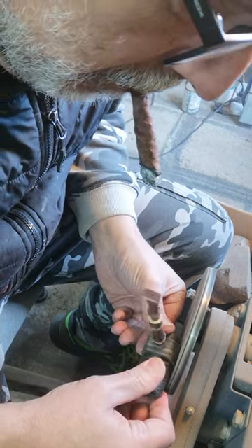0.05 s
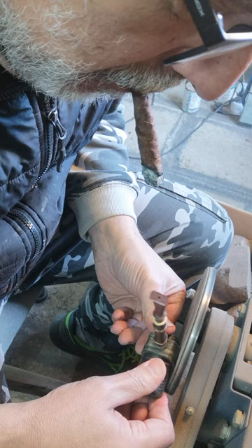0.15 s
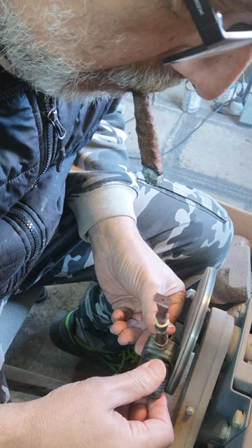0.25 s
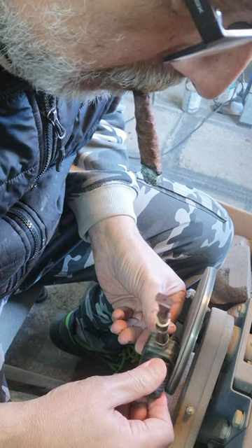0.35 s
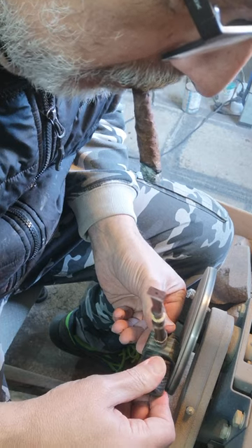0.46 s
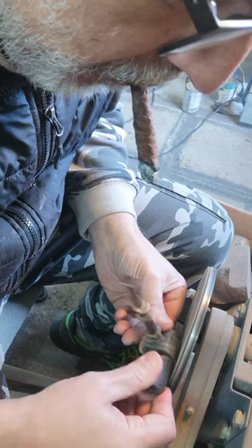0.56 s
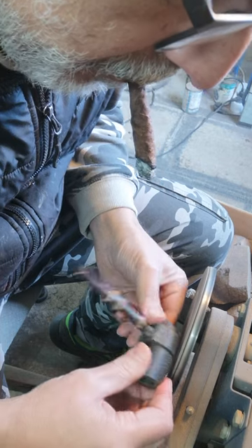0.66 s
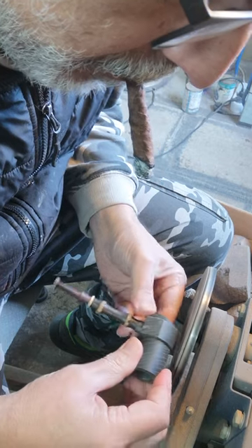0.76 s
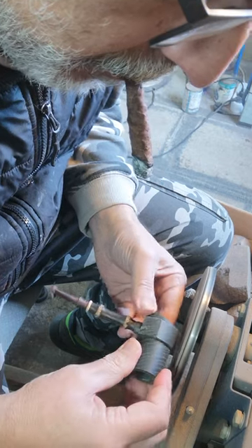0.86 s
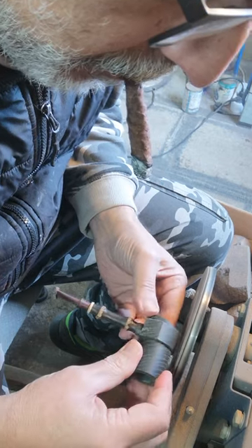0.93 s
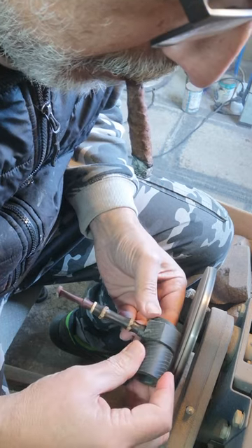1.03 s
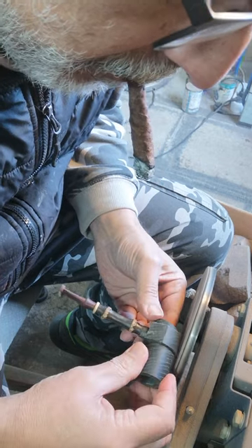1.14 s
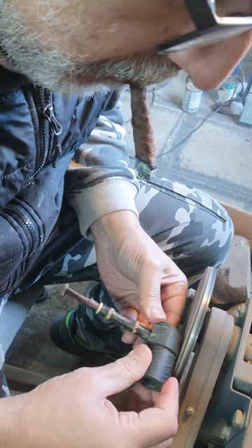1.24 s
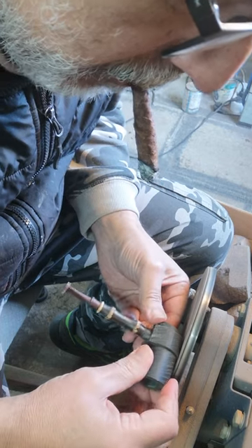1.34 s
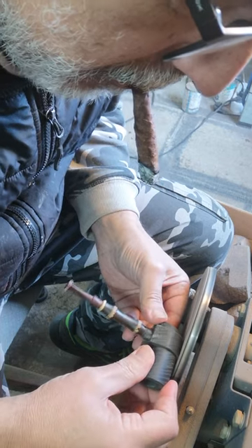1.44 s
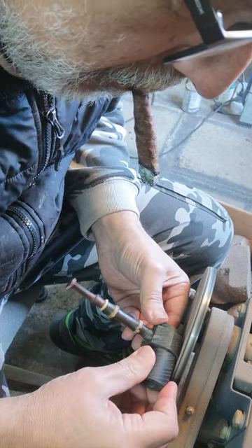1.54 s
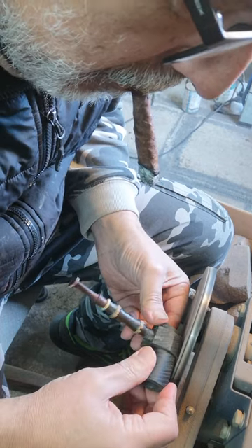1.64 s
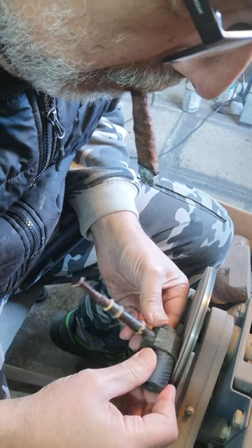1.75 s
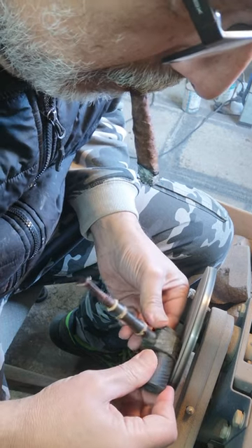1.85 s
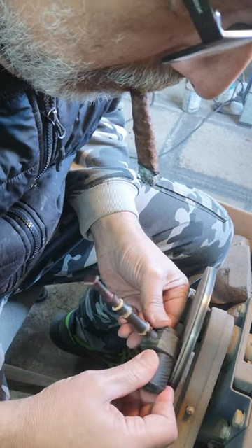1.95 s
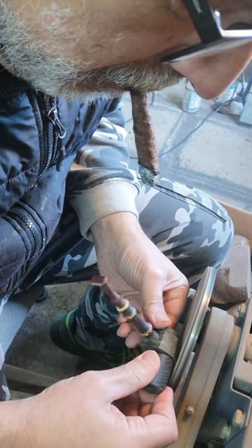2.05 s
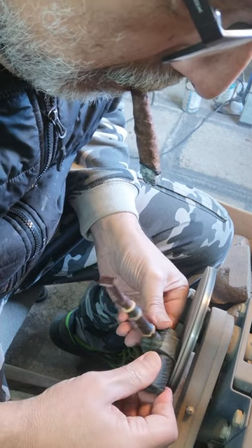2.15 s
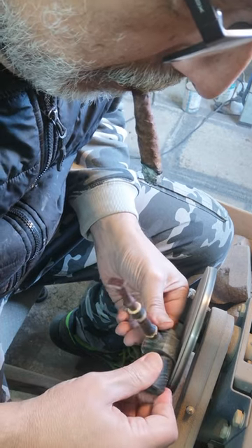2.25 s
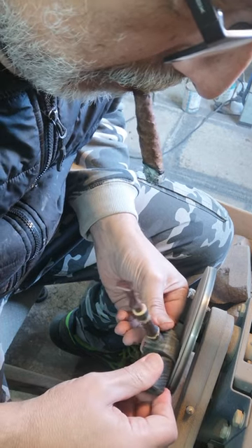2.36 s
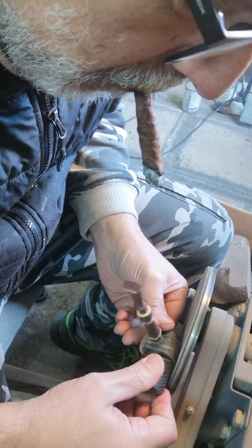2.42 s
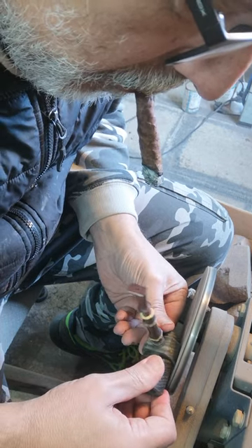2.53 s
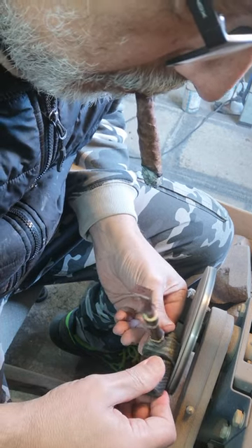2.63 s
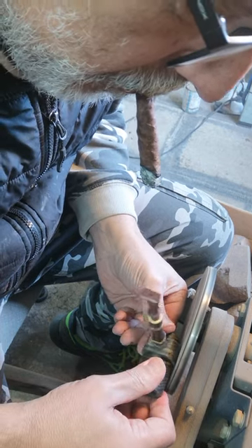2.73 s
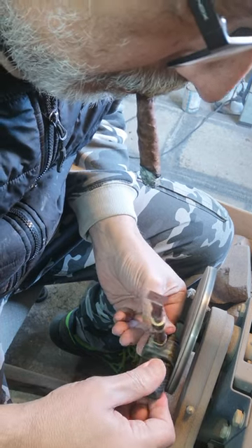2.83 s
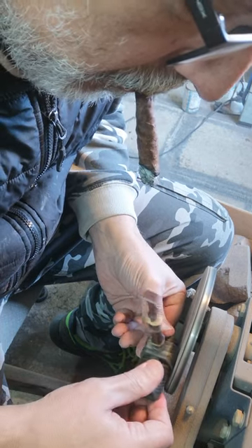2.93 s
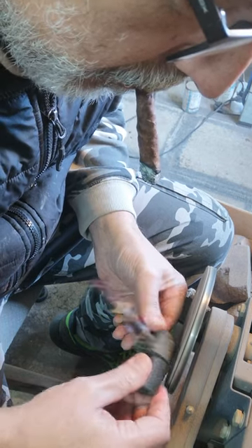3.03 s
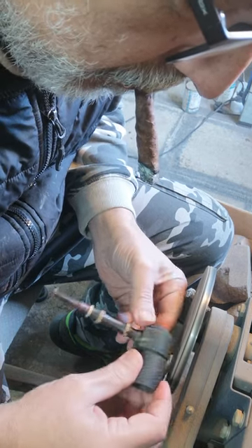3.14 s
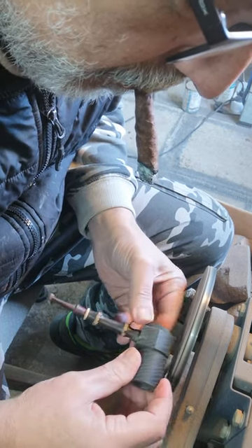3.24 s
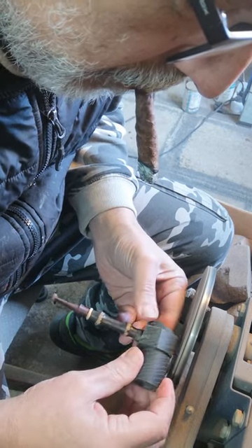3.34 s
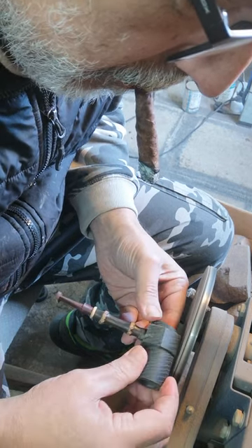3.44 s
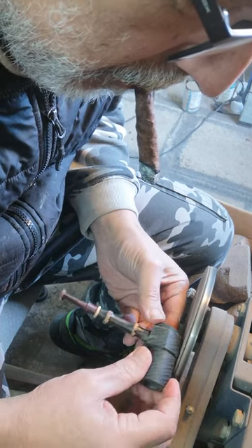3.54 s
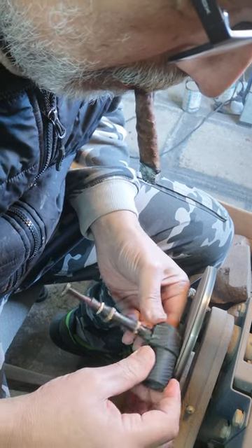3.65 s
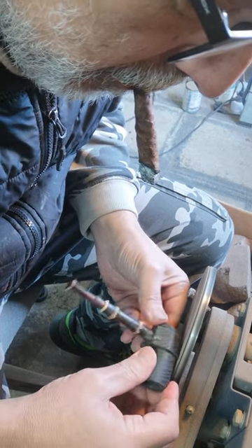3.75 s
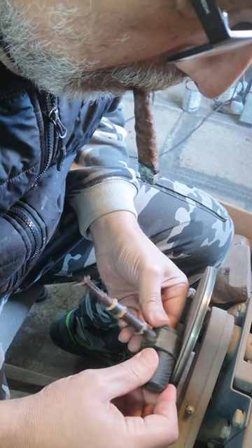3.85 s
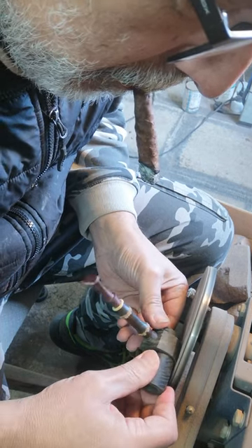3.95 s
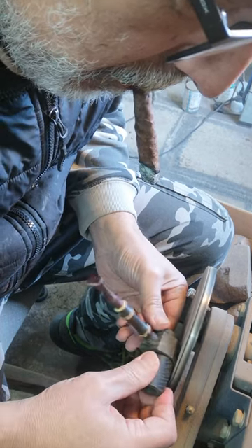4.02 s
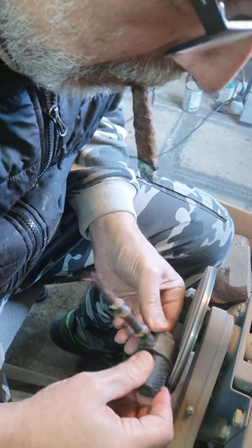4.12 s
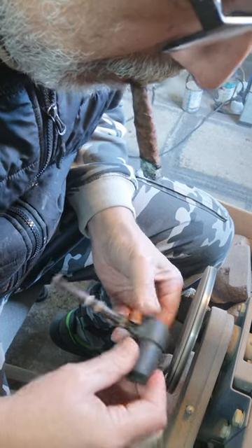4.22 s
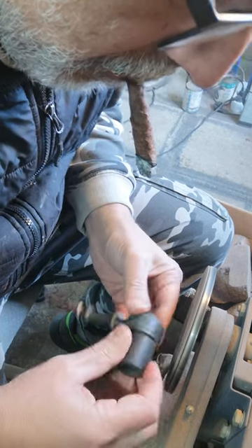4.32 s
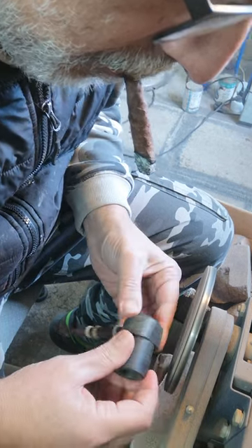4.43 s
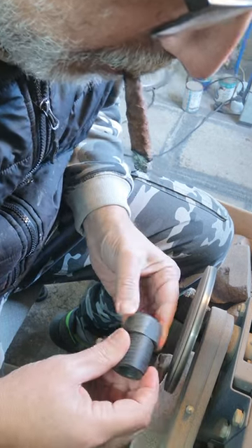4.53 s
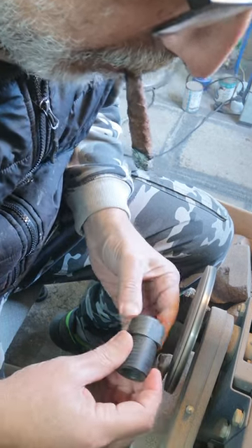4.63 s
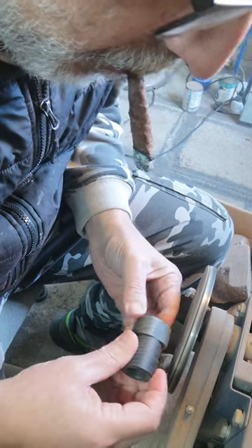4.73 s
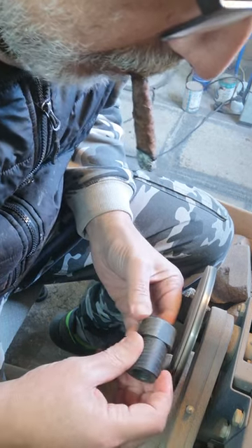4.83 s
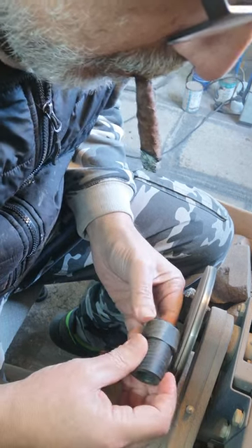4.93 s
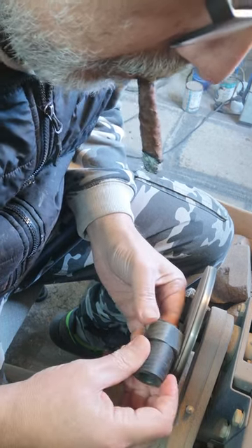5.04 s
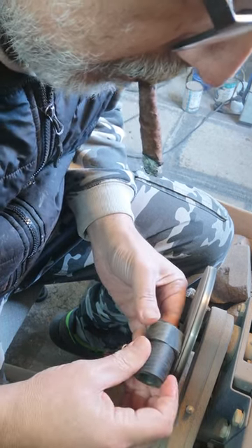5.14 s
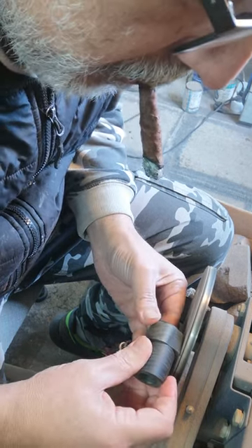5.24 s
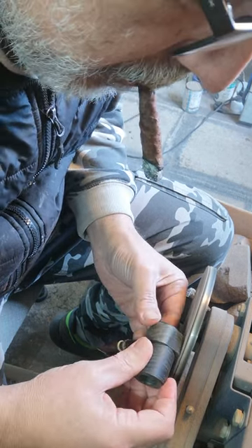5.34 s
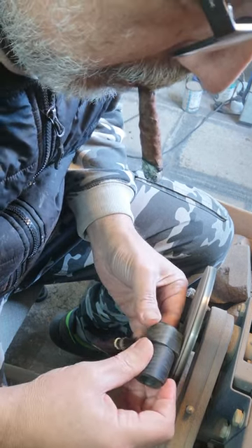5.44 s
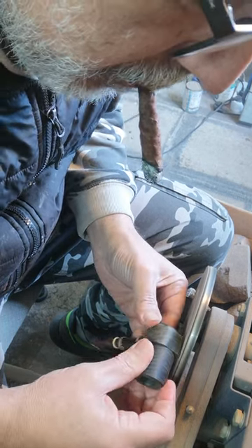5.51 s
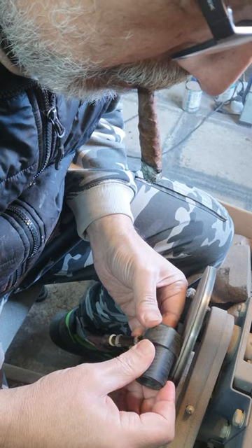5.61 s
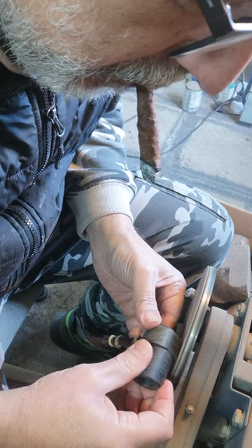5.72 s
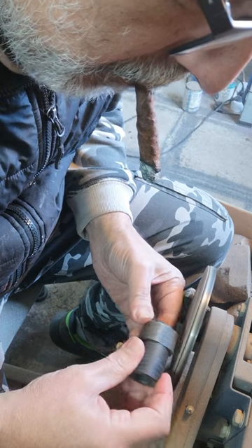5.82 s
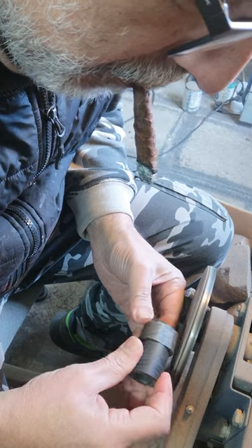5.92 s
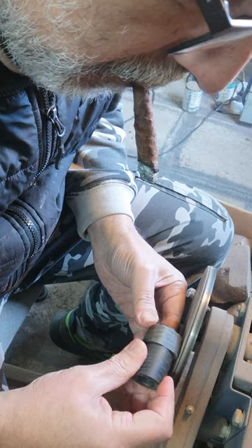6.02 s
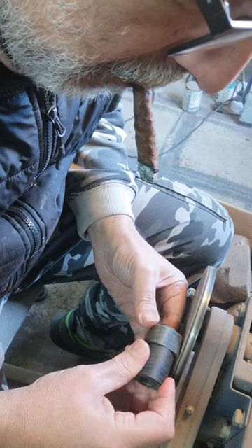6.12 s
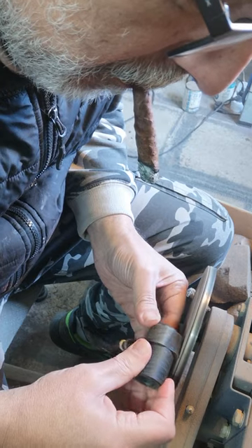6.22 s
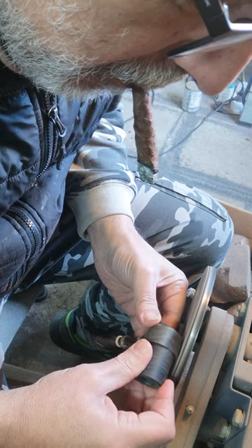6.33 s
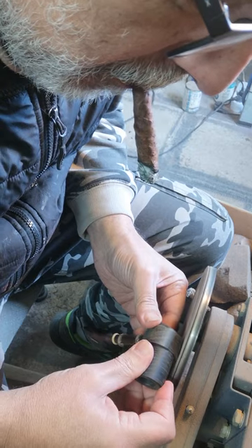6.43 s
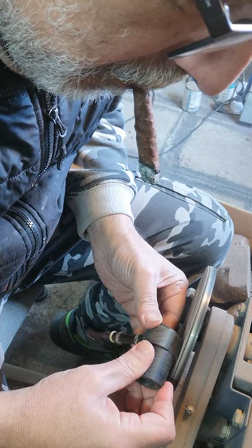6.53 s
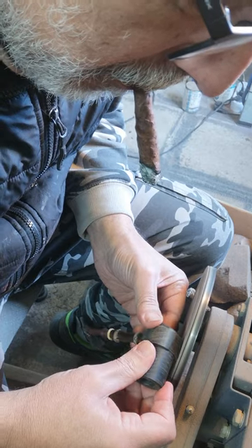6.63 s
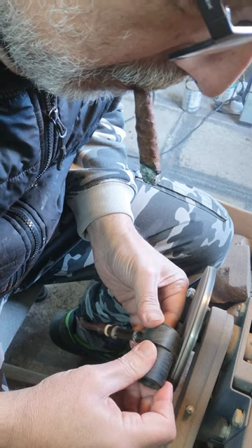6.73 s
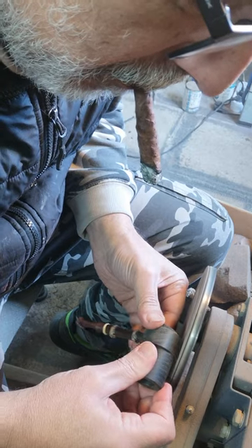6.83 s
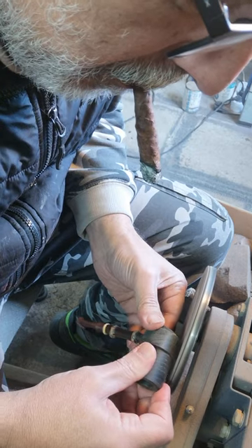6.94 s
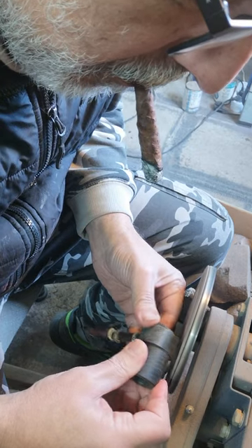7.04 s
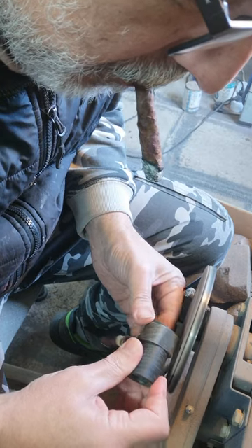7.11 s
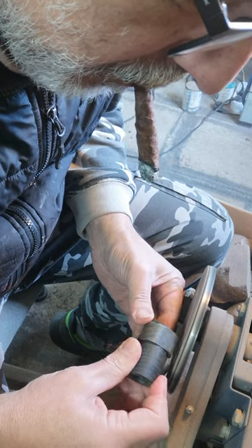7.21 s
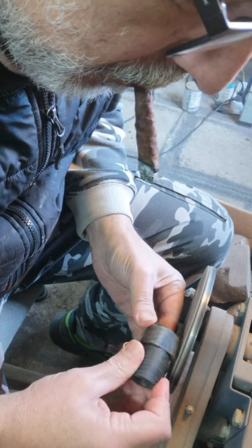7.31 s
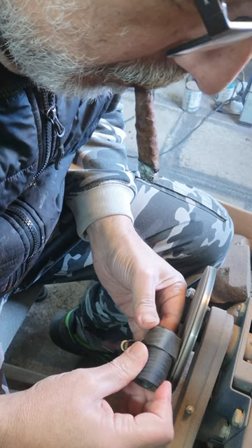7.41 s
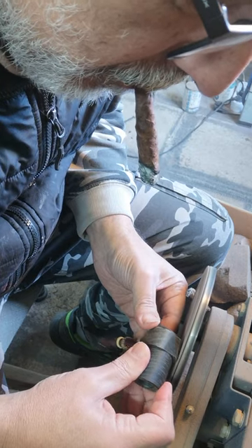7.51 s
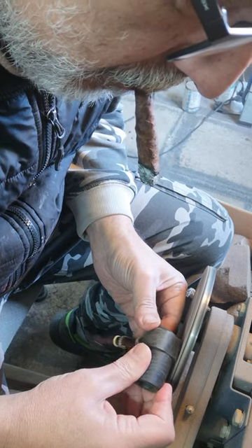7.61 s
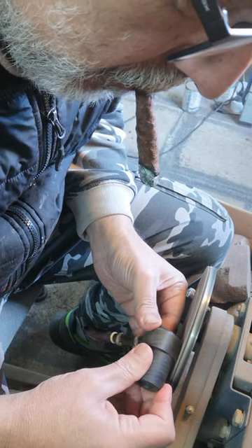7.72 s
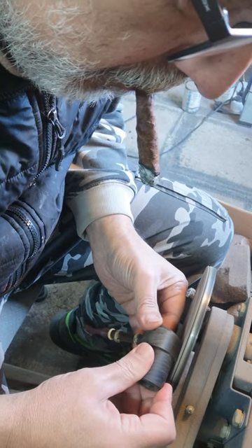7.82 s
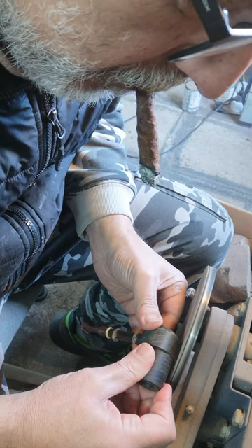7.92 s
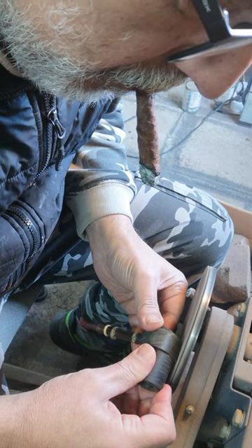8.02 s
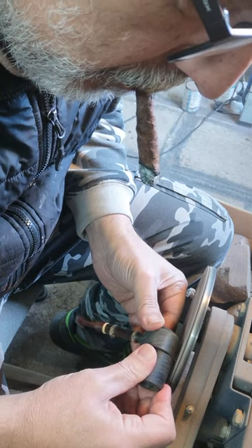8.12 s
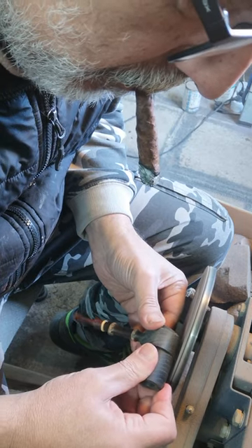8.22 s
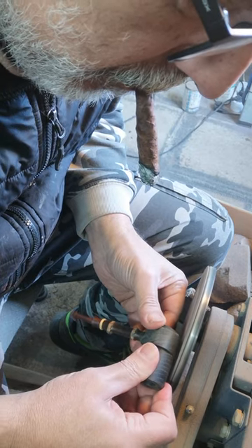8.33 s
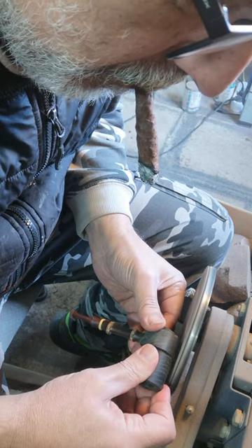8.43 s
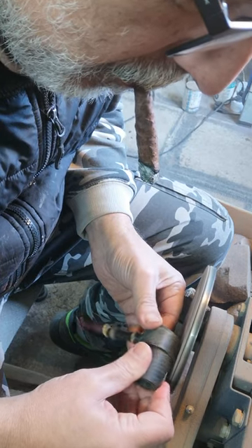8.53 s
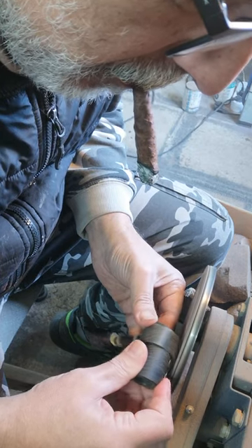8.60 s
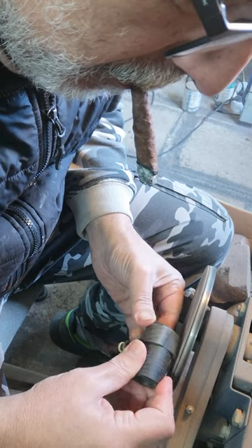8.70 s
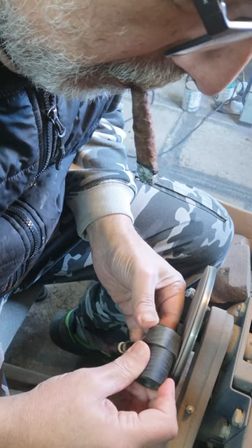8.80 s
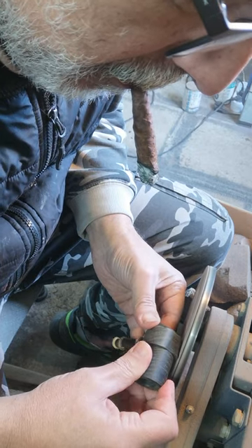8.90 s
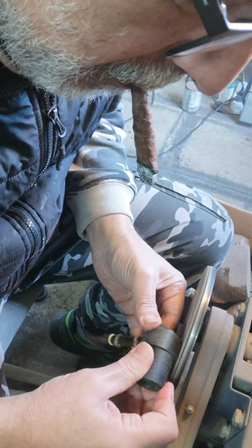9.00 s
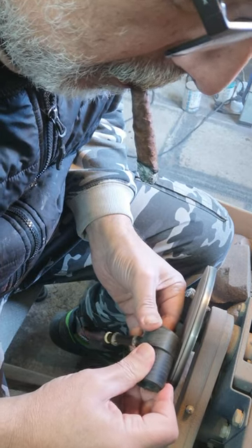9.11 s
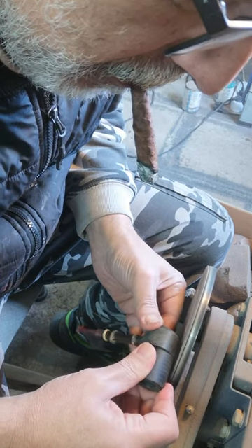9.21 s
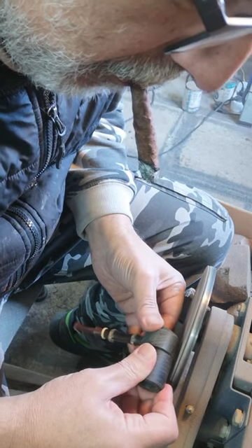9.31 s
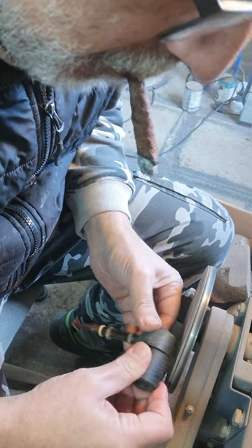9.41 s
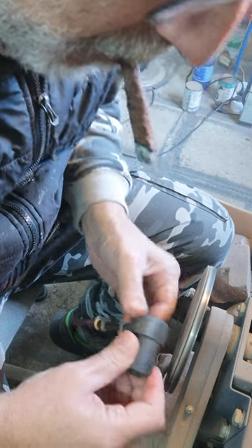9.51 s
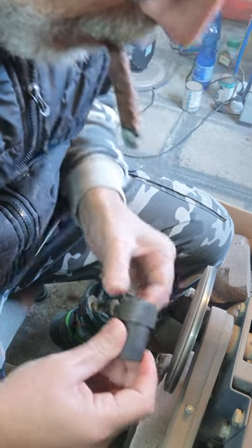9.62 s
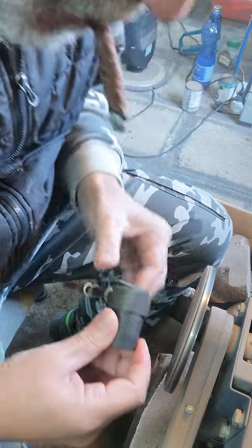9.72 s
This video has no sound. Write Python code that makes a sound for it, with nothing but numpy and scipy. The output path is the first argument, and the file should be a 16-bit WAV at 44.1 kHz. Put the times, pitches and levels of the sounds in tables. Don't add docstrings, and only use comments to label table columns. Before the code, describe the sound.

Seven coarse, fizzy sanding rasps of uneven length, with a low electric motor throb swelling in the gaps and a few dull knocks.

```python
import sys
import numpy as np
from scipy import signal
from scipy.fft import rfft, irfft
from scipy.io import wavfile
from scipy.ndimage import uniform_filter1d

SR = 44100
rng = np.random.default_rng(int(sys.argv[2]) if len(sys.argv) > 2 else 0)


def generate_wav(sig):
    pcm = np.round(np.clip(np.atleast_2d(sig).T, -1, 1) * 32767).astype(np.int16)
    wavfile.write(sys.argv[1], SR, pcm)


def field_ratio(decibels):
    return 10 ** (np.asarray(decibels, dtype=float) / 20)


N = 430416
T = np.arange(N) / SR

# touch in seconds, hold in seconds, rasp level at landing
# in dB, level it settles towards in dB, settling time in seconds.
PRESSES = [
    (-0.3, 1, -21, -18.5, .35),
    (1.322, 1.738, -22.5, -18.5, 1.1),
    (3.651, 0.54, -26, -19, 0.31),
    (5.191, 0.63, -28.5, -17, 0.24),
    (6.166, .924, -28, -17.2, 0.1276),
    (7.486, 1.099, -25, -16.5, 0.244),
    (8.911, 0.56, -22.5, -15.5, 0.47),
]
# extra jolt at landing in dB, then, in dB from the rasp,
# low scrape, fizz at landing, fizz at lift and 4th shaft order (this last one an absolute level in dB).
FACES = [(0.1, -7.5, -7.5, -8, -39.5), (0.1, -7, -11.5, -6, -42), (6.5, -7.5, -8.5, -9.5, -43),
         (0.1, -10.5, -2.5, -5, -43), (0.1, -12, -3, -8, -42.5), (0.1, -12, -3, -10, -51),
         (0.1, -11, -3, -6.5, -48)]


def rasp(turns):
    # frequency in Hz, left level in dB, right level in dB.
    rasp_tone = [(1300, -100, -84), (2430, -60.5, -70.5), (3310, -56.5, -58.5), (4700, -51, -53),
                 (6010, -47, -57.5), (7140, -59, -55), (7050, -46.5, -55.5), (7900, -62, -54.5),
                 (9300, -91, -57), (10350, -64, -57.5), (11470, -64.5, -65.5), (12800, -68.5, -62),
                 (14200, -62, -65.5), (15900, -86, -60)]
    # frequency in Hz, likeness from 0 to 1, lead of the left in radians.
    rasp_pair = [(2400, .55, -2.9), (3300, .45, -2), (5200, .6, -2.2), (6000, .45, 1), (7200, .55, 3.1),
                 (7450, .6, 3.1), (7700, .85, 1), (8100, .7, .8), (8400, .7, -1.3), (9300, .65, 0),
                 (11000, .55, 1.2), (11600, .4, -.3), (13000, .55, -1), (15200, .5, -3.3)]
    # frequency in Hz, width in Hz, left level in dB, right level in dB.
    disc_rings = [(4183, 300, -81.5, -54), (6140, 86, -69.5, -133), (6920, 430, -82, -57),
                  (7473, 220, -42.5, -85), (7764, 344, -42, -77), (9150, 210, -50.5, -67),
                  (8600, 89, -49, -63), (9760, 320, -66.5, -51.5), (11400, 150, -82, -74.5),
                  (14000, 300, -70, -73)]
    landings_s = [.01, 0.032, .004, .012, 0.017, .005, .003]
    dull_per_db = 0.5
    low_linger, fine_hurry = 0.53, 0.2
    jolt_s = 0.033
    ease_db_per_s, part_db_per_s2 = 90, 2300

    hit = rng.random((2, N)) < 14000 / SR
    size_db = 2.0 * np.minimum(rng.exponential(1, (2, N)), 5)
    grit = hit * rng.choice([-1., 1.], (2, N)) * field_ratio(size_db)
    scrape = at_ports(evened(grit), rasp_tone, rasp_pair, disc_rings, ripple_db=2.0, ripple_hz=40)
    scrape = drifting(scrape, patchy_db=1.5)
    low = band(scrape, 1000, 6500)
    mid = band(scrape, 6500, 10000)
    fine = band(scrape, 10000, 30000)

    out = np.zeros((2, N))
    for press, face, land_s in zip(PRESSES, FACES, landings_s):
        jolt_db, low_db, first_db, last_db, _ = face
        since, after, gone, db = contact(*press)
        fall_db = ease_db_per_s * after + part_db_per_s2 * after ** 2
        early_fall_db = np.minimum(fall_db, 18)
        low_db = low_db - dull_per_db * (db - db[-1] + 0.5) + low_linger * early_fall_db
        fine_db = first_db + (last_db - first_db) * gone - fine_hurry * early_fall_db
        db = db + jolt_db * since / jolt_s * np.exp(1 - since / jolt_s) - fall_db
        layers = mid + field_ratio(low_db) * low + field_ratio(fine_db) * fine
        out += np.minimum(since / land_s, 1) * field_ratio(db) * layers

    left_over_right_db = -2.54 + 1.0 * wander(1.8)
    out *= field_ratio(np.outer([.5, -.5], left_over_right_db))
    wobble_db = 0
    for k, db in enumerate([0.48, 0.15, 0.11, 0.2], 1):
        wobble_db = wobble_db + db * np.cos(2 * np.pi * (k * turns + rng.random()))
    tremor_db = 0.18 * wander(1.6) + 0.48 * wander(100.0)
    return out * field_ratio(wobble_db + tremor_db)


def motor(speed, turns, fourth_db):
    # order, level in dB from the throb.
    free_orders = [(5, -9.5), (6, -18.5), (7, -20), (10, -19.5), (13, -27.5), (16, -32.5), (19, -26),
                   (25, -32), (32, -18)]
    # order, level in dB from the 4th order.
    load_orders = [(1, -9), (7, -19), (8, -13), (11, -14.5)]

    def tone(cycles, db):
        return np.sqrt(2) * field_ratio(db) * np.sin(2 * np.pi * (cycles + rng.random()))

    throb_hz, throb_db = throb(speed)
    out = tone(np.cumsum(throb_hz) / SR, throb_db)
    out += tone(100 * T, -47.5 + 1.9 * wander(1.7))
    out += tone(2 * turns, -54 + 5.4 * wander(4.7))
    out += tone(4 * turns, fourth_db)
    for k, db in free_orders:
        out += tone(k * turns, throb_db + db + 2.0 * wander(0.6))
    for k, db in load_orders:
        out += tone(k * turns, fourth_db + db + 4.9 * wander(3.8))
    return out * field_ratio(np.array([[.2], [-.2]]))


def shaft():
    free_turns, sag_turns = 25.0, 1.9
    sag_per_db = 0.4
    sag_s, pickup_s = 0.25, 0.09
    fourth_free_db = -52
    sag, fourth_db = 0, fourth_free_db
    for press, face in zip(PRESSES, FACES):
        since, after, _, db = contact(*press)
        load = (1 - np.exp(-(since / sag_s) ** 2)) * np.exp(-(after / pickup_s) ** 2)
        sag = sag + load * sag_turns * field_ratio(sag_per_db * (db + 19.5))
        fourth_db = fourth_db + load * (face[-1] - fourth_free_db)
    return free_turns - sag, fourth_db + 1.56 * wander(3.2)


def throb(speed):
    # start in seconds, length in seconds,
    # starting pitch in Hz, first level in dB, last level in dB.
    throbs = [
        (0.842, .6, 76, -36.5, -32),
        (3.188, 0.57, 74.6, -36, -36),
        (4.265, 1.2, 77.86, -34.5, -43),
        (5.896, 0.393, 76.9, -35, -35),
        (7.157, 0.54, 84, -36.5, -49),
        (8.638, .41, 83, -35.5, -46),
        (9.57, 0.2, 84, -31.5, -41),
    ]
    rest_hz, settle_s, swell_s = 74.7, 0.0899, 0.106
    hz, db = 3 * speed, -53.5 + 3.0 * wander(3.5)
    for start, length, start_hz, first_db, last_db in throbs:
        since = T - start
        free = np.clip(np.minimum(since + swell_s, length - since) / swell_s, 0, 1)
        free_hz = rest_hz + (start_hz - rest_hz) * np.exp(-np.maximum(since, 0) / settle_s)
        free_db = first_db + (last_db - first_db) * since / length
        hz = hz + free * (free_hz - hz)
        db = db + free * (free_db - db)
    return hz + .5 * wander(4.), db + 2.8 * wander(2.8)


def taps():
    # time in seconds, peak level in dB, ring frequency in Hz.
    knock_list = [
        (5.109, -21.5, 856),
        (7.245, -22.5, 870),
        (8.11, -26, 760),
        (8.305, -28, 760),
        (8.352, -26, 740),
        (8.397, -25, 780),
        (8.442, -24, 700),
        (8.913, -26, 820),
    ]
    out, t = np.zeros(N), np.arange(1500) / SR
    for start, db, hz in knock_list:
        fading = field_ratio(db - 60 * t / .045)
        out[round(start * SR):][:1500] = fading * np.sin(2 * np.pi * hz * t) * np.tanh(t / .0015)
    return out * np.array([[.8], [1.2]])


def whirr():
    # frequency in Hz, left level in dB, right level in dB.
    whirr_tone = [(38.9, -93, -101), (139, -71, -77), (320, -74.5, -72.5), (529, -74, -78),
                  (633.7, -60.5, -53.5), (910, -69.5, -59), (1318, -73, -76.5), (1520, -67.5, -66.5),
                  (2820, -68, -71.5), (3380, -77.5, -75), (6070, -75.5, -80.5), (9470, -88, -76),
                  (9800, -92, -85), (15200, -104, -93.5)]
    # frequency in Hz, likeness from 0 to 1, lead of the left in radians.
    whirr_pair = [(40, .995, 0), (160, .97, 0), (320, .8, -.2), (440, .4, -1.2), (600, .9, -2.5),
                  (1000, .6, -2.2), (1300, .35, -1.4), (1900, .3, -2.4), (2450, .65, -3), (3000, .3, -2),
                  (7000, .3, 0), (7400, .6, 0), (8000, .2, 0)]
    # frequency in Hz, width in Hz, left level in dB, right level in dB.
    housing = [(43.5, 2.3, -54, -52), (82.4, 8, -54.5, -67), (178.4, 27, -66, -62), (254.2, 9.1, -65, -66),
               (835, 90, -67, -58.5), (2284, 197, -63.5, -62), (2645, 296, -87, -59.5),
               (3560, 120, -71, -87), (5820, 190, -77, -69), (7420, 280, -65, -74), (7940, 260, -70, -99)]
    hiss = rng.standard_normal((2, N))
    noise = at_ports(hiss, whirr_tone, whirr_pair, housing, ripple_db=1.9, ripple_hz=20)
    flutter_db = .5 + .8 * wander(10.)
    return drifting(noise, patchy_db=1.3) * field_ratio(duck() + flutter_db)


def duck():
    duck_db, duck_s, unduck_s = -4.5, 0.042, 0.48
    held_db, regain_s = -1, 0.3
    db = 0
    for press in PRESSES:
        since, after, gone, level_db = contact(*press)
        db = db + duck_db * (1 - np.exp(-since / duck_s)) * np.exp(-since / unduck_s)
        held = np.clip(after / duck_s + gone ** 30, 0, 1)
        db = db + held_db * field_ratio(level_db[-1] + 17.5) * np.exp(-after / regain_s) * held
    return db


def contact(start, hold, land_db, firm_db, settle):
    since = np.maximum(T - start, 0)
    after = np.maximum(T - start - hold, 0)
    level_db = firm_db + (land_db - firm_db) * np.exp(-(since - after) / settle)
    return since, after, np.minimum(since / hold, 1), level_db


def at_ports(drives, table, pairing, modes, ripple_db, ripple_hz):
    hz = np.fft.rfftfreq(N, 1 / SR)
    power = field_ratio(np.array(columns(table, hz, log=True))) ** 2
    for mode_hz, width, *db in modes:
        peak = field_ratio(np.array(db))[:, None] ** 2
        power = power + peak / (1 + (2 * (hz - mode_hz) / width) ** 2) ** 2
    same, lead = columns(pairing, hz, log=True)
    knots = np.minimum(rng.standard_normal((2, 1200)), 1.5)
    comb = np.array([np.interp(hz / ripple_hz, np.arange(1200), k) for k in knots])
    comb *= hz ** 2 / (hz ** 2 + 300 ** 2)
    direct, diffuse = rfft(drives)
    left = direct * np.exp(1j * lead)
    right = same * direct + np.sqrt(1 - same ** 2) * diffuse
    return irfft(np.array([left, right]) * np.sqrt(power * SR / 2) * field_ratio(ripple_db * comb), N)


def drifting(x, patchy_db):
    _, _, z = signal.stft(x, SR, nperseg=512)
    patches = uniform_filter1d(rng.standard_normal(z.shape), size=7, axis=1)
    patches = uniform_filter1d(patches, size=60, axis=2)
    return signal.istft(z * field_ratio(patchy_db * evened(patches)), SR, nperseg=512)[1][:, :N]


def band(x, lo_hz, hi_hz):
    hz = np.fft.rfftfreq(N, 1 / SR)

    def edge(at_hz):
        return .5 + .5 * np.tanh((hz - at_hz) / 300)

    part = irfft(rfft(x) * (edge(lo_hz) - edge(hi_hz)), N)
    return part / np.sqrt(np.mean(part.mean(0) ** 2))


def columns(rows, t, log=False):
    at, *rest = np.transpose(rows)
    if log:
        at, t = np.log(at), np.log(t + 1)
    return [np.interp(t, at, c) for c in rest]


def wander(rate):
    steps = rng.standard_normal(4000)
    slowing = np.sqrt(1 + (np.fft.rfftfreq(4000, 1 / 400) / rate) ** 4)
    smooth = irfft(rfft(steps) / slowing)
    return evened(np.interp(T, np.arange(4000) / 400, smooth))


def evened(x):
    return x / np.sqrt(np.mean(x ** 2) + 1e-20)


def scene():
    speed, fourth_db = shaft()
    turns = np.cumsum(speed) / SR
    return rasp(turns) + motor(speed, turns, fourth_db) + taps() + whirr()


def top_cut(x):
    return signal.sosfilt(signal.butter(12, 15800, fs=SR, output="sos"), x)


def record(dry):
    cut = signal.lfilter(*signal.butter(N=2, Wn=32, btype="high", fs=SR), dry)
    cut = 1.3 * np.tanh(cut / 1.3)
    treble_limit = signal.firwin(511, 15250, window=("kaiser", 9), fs=SR)
    cut = signal.oaconvolve(cut, treble_limit[None], "same")
    return top_cut(cut)


dry = scene()
out = record(dry)
generate_wav(out)
```